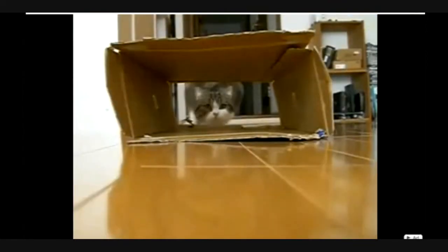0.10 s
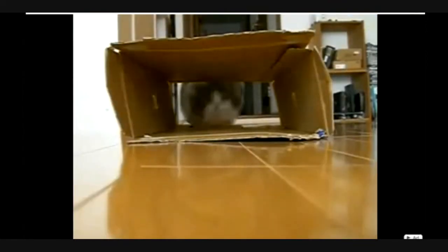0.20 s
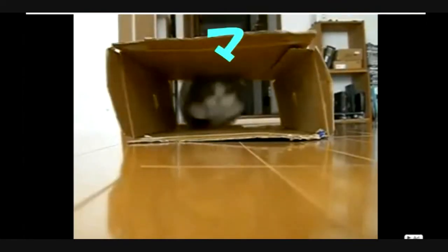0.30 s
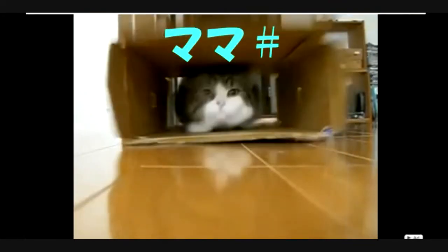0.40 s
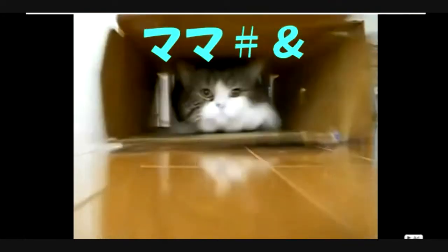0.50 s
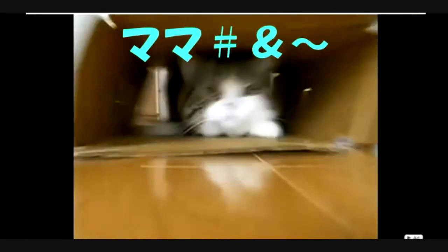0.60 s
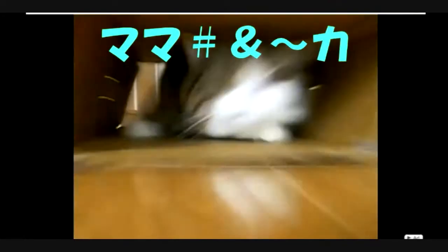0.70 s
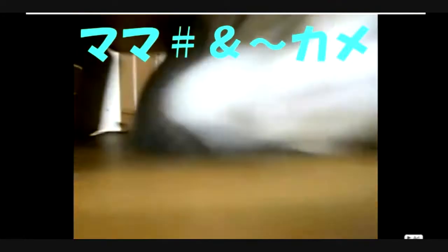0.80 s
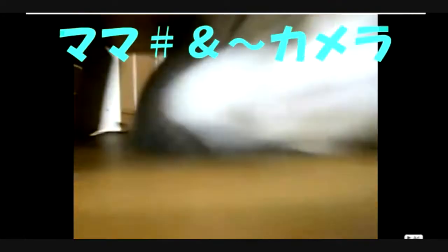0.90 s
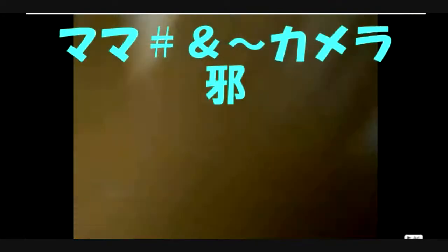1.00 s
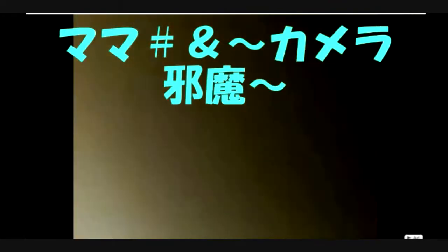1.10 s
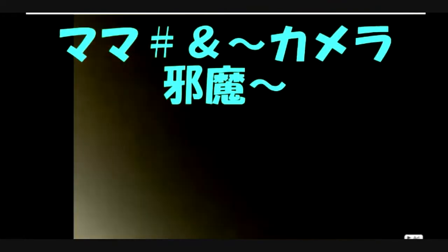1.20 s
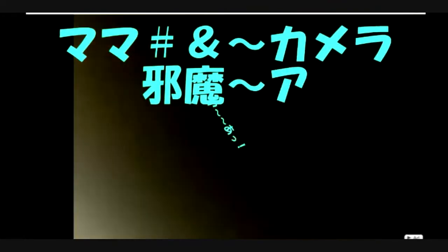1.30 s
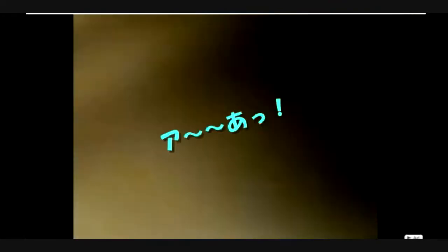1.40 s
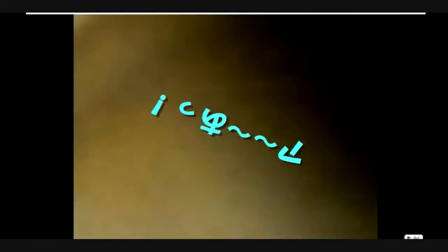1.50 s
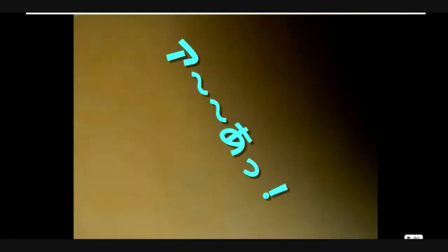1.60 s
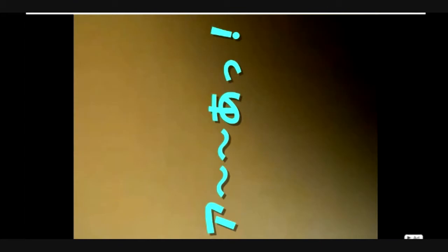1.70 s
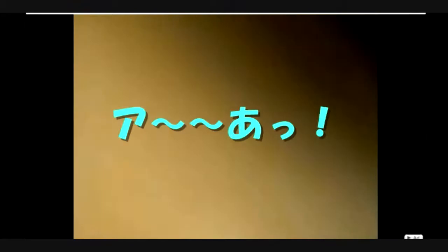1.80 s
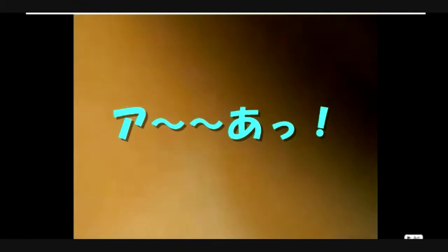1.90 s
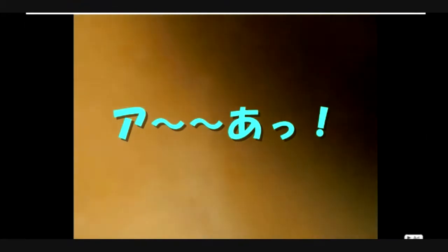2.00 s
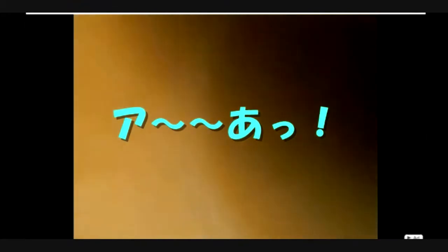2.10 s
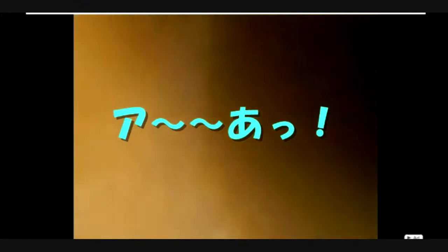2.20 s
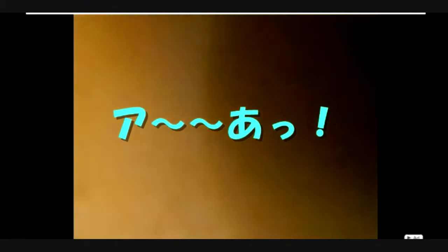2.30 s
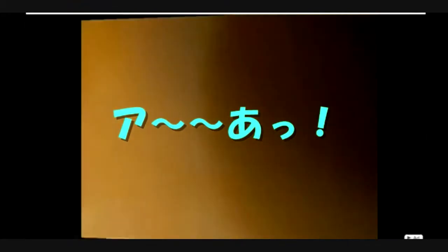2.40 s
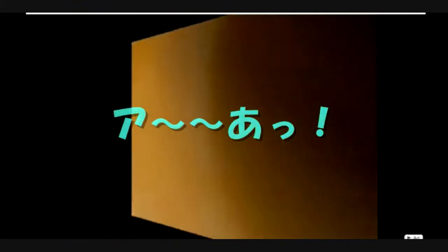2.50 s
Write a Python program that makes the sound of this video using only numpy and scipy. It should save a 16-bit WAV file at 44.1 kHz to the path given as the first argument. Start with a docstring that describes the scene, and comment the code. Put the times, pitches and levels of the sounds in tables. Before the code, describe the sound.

A cardboard box scrapes across a wooden floor, pushed by a running cat. Soft low paw thuds start around 0.2 s while the skid swells, until the box bumps the microphone near 0.8 s. It glides on with hissy scraping and rumbling panels to about 1.5 s, then hard knocks cluster at 1.6-1.7 s. Dull rubbing and small bumps fade by 2.5 s. Quiet room, very close, softly overloaded.

```python
"""Cat shoves a cardboard box into a camera

Paws thud; the box skids louder and louder over a wooden floor, hits a small camera, slides on, knocks and rubs.
Thumps are decaying tone pairs; knocks are random clicks around a blunt push, ringing in cardboard.
Skid, slide, rub and panel rumble are clumped random clicks, each with its own colour and level curve.
A quiet room noise lies beneath; the microphone overloads softly and narrow dips colour the whole.
"""
import sys
import numpy as np
from scipy import signal
from scipy.fft import rfft, irfft
from scipy.io import wavfile
from scipy.ndimage import uniform_filter1d

SR = 44100
rng = np.random.default_rng(int(sys.argv[2]) if len(sys.argv) > 2 else 0)


def dump_mix(stems):
    """Bounce the given channels to the path in sys.argv[1] as a 16-bit WAV at rate SR."""
    frames = np.atleast_2d(stems).T  # one column per channel
    limited = np.clip(frames, -1, 1)  # hard clip at full scale
    pcm = np.round(limited * 32767).astype(np.int16)
    wavfile.write(sys.argv[1], SR, pcm)


N = 114660

# Soft, heavy blows of paws and body on box and floor.
# Each row: start in seconds, level in dB, pitch in Hz, half the Gaussian fall time in seconds.
THUMPS = [(0.091, -22, 131, 0.0084), (0.218, -11.5, 103, 0.011), (0.247, -1.5, 109, 0.0036),
          (0.386, -9.5, 101, 0.011), (0.419, -6.5, 112, 0.0096), (0.647, -10.5, 134.6, 0.016),
          (0.694, -8, 112, 0.0039), (0.726, -8, 98.6, 0.014), (0.789, 0.5, 99, 0.0061),
          (.824, -20, 230, 0.0078), (.932, -9, 132, 0.0025), (1.017, -16, 106, 0.0049),
          (1.435, -5.5, 122, 0.0019), (1.453, -3.5, 135, 0.0051), (1.570, -6.5, 99, 0.0029),
          (1.618, -1, 118, 0.0037), (1.647, -0.5, 157, 0.0041), (1.662, -5, 84, 0.0028),
          (1.676, -8, 138, .003), (1.69, -6, 101, 0.0061), (1.991, -11, 243, 0.0054),
          (2.106, -9, 176, 0.0033), (2.161, -4.5, 219, 0.0046), (2.299, -3.5, 152, 0.0023)]
# Knocks and scuffs of cardboard edges and claws.
# Each row: peak in seconds, level in dB, rise in seconds, decay in seconds, brightness in dB per octave.
KNOCKS = [(0.217, -29, 0.0048, 0.011, 3), (0.25, -24.5, 0.006, 0.005, -0.5),
          (0.388, -21.5, 0.0012, 0.0045, 2), (0.427, -21.5, 0.0048, 0.0044, 2.5),
          (0.523, -22.5, 0.0075, 0.0059, 4.5), (0.733, -15.5, .003, 0.0017, 1.5),
          (0.796, -12, 0.012, 0.0011, 1), (0.829, -24, 0.00077, 0.0026, 3),
          (0.938, -22.5, 0.0048, 0.013, 1.5), (1.002, -20.5, 0.0007, 0.0073, 1.5),
          (1.35, -18.5, 0.0047, 0.0026, -4.5), (1.454, -8.5, 0.0039, 0.0021, -1.5),
          (1.505, -13, 0.00062, 0.0051, -1.5), (1.54, -21.5, 0.00094, 0.007, 0.5),
          (1.615, -1.5, 0.00067, 0.0028, 0), (1.622, -12.5, 0.00086, 0.0031, -1.5),
          (1.644, -7, 0.00091, 0.0036, -7), (1.653, -13.5, 0.0032, 0.0023, -1),
          (1.692, -10.5, 0.0021, 0.0027, -2.5), (1.700, -9, 0.0024, 0.0032, 1),
          (1.73, -20, 0.0067, 0.0075, -2.5), (1.937, -24, 0.00068, .005, 0.5),
          (1.979, -18.5, .0007, 0.0033, -5), (2.16, -19, 0.0031, 0.0021, 0.5),
          (2.200, -21.5, 0.0039, 0.0086, 0), (2.272, -31, 0.0016, 0.00075, -1),
          (2.307, -21, 0.003, 0.0053, 0.5)]
# Box pushed hard over the floor. Each row: time in seconds, level in dB.
SKID_LEVEL = [(.05, -64.5), (.17, -44.5), (.23, -37.5), (.36, -35), (.44, -26.5), (.54, -26), (.61, -21),
              (.72, -20.5), (.785, -18), (.81, -42), (1.52, -67), (1.565, -30.5), (1.605, -29.5),
              (1.64, -64)]
# Box gliding on after the hit. Each row: time in seconds, level in dB.
SLIDE_LEVEL = [(.82, -57), (.87, -28), (.91, -37.5), (.98, -35.5), (1.02, -31), (1.17, -29), (1.25, -32),
               (1.30, -37.5), (1.44, -33), (1.53, -44), (1.76, -38), (1.93, -37.5)]
# Pressure of the box wall on the camera. Each row: time in seconds, level in dB.
RUB_PRESSURE = [(.78, -46), (.81, -21), (.87, -26.5), (.91, -36), (.98, -67), (1.015, -21.5), (1.08, -43),
                (1.23, -27.5), (1.33, -22.5), (1.44, -25), (1.49, -31.5), (1.56, -24.5), (1.73, -24),
                (1.92, -25.5), (1.99, -20.5), (2.21, -21.5), (2.28, -23.5), (2.49, -33), (2.6, -40.5)]
# Drumming of the box panels as the load shifts. Each row: time in seconds, level in dB.
RUMBLE_LEVEL = [(0, -52), (.18, -35), (.28, -19), (.35, -24.5), (.50, -22), (.58, -24.5), (.65, -17.5),
                (.79, -20), (.87, -19.5), (.92, -39), (1.03, -21.5), (1.10, -32.5), (1.24, -27.5),
                (1.44, -23.5), (1.78, -38), (2.1, -30.5), (2.33, -33), (2.56, -39)]

# Spectrum of the hard skid. Each row: frequency in Hz, relative density in dB.
SKID_COLOUR = [(150, -1.5), (500, -11), (1300, -4), (1600, 0.5), (2200, -3.5), (3000, -7), (4500, -14.5),
               (6600, -18), (9200, -16.5), (13000, -61.5)]
# Spectrum of the glide. Each row: frequency in Hz, relative density in dB.
SLIDE_COLOUR = [(200, -5.5), (600, 3.5), (1600, 2.5), (2400, 4), (3100, 1), (4400, -9.5), (6600, -12.5),
                (8400, -7), (13000, -45.5)]
# Spectrum of the rubbing wall. Each row: frequency in Hz, relative density in dB.
RUB_COLOUR = [(30, -46.5), (90, -3.5), (150, 7), (240, -1.5), (340, -6.5), (700, -8.5), (1100, -14.5),
              (1600, -13.5), (2200, -24.5), (3300, -24.5), (4600, -32), (9500, -34), (13000, -55)]
# Spectrum of the drumming panels. Each row: frequency in Hz, relative density in dB.
RUMBLE_COLOUR = [(25, -11), (65, -1.5), (110, -4), (270, -11.5), (400, -19), (1000, -40)]
# Spectrum of a knock before its own tilt. Each row: frequency in Hz, relative density in dB.
KNOCK_COLOUR = [(50, -12.5), (220, 2), (400, 6.5), (720, 0.5), (1150, -6), (1750, -2.5), (2200, -11.5),
                (3000, -12), (4500, -20), (9300, -23), (13000, -54.5)]
# Spectrum of the room noise. Each row: frequency in Hz, relative density in dB.
ROOM_COLOUR = [(25, -20), (140, 8), (280, -14.5), (2400, -26), (7300, -28), (13000, -61.5)]
# Narrow dips in the sound, as from a close reflection.
# Each row: centre in Hz, width in Hz, depth in dB.
DIPS = [(1180, 45, 11), (1970, 35, 9), (2350, 35, 7), (3520, 70, 7)]

THUMP_RISE_S, THUMP_OVERTONE_RATIO, THUMP_OVERTONE_DB = 0.0023, 2.224, -15
PANEL_RING_DB, PANEL_RING_S = -31, 0.0094
PUSH_DB, PUSH_S = -0.5, 0.00029  # push against crunch, and its length
GRIT_HZ, GRIT_GROWTH = 1100, 0.49  # above GRIT_HZ, extra exponent on pressure
FLEX_DB, FLEX_HZ, FLEX_S = 2, 129, 0.069  # resonance shifts: depth, width, lifetime
SKID_ECHO_DB, NEAR_ECHO_DB, ECHO_T60_S = -12.5, -22, 0.14
ROOM_DB = -43
STOP_LOW_HZ, STOP_HIGH_HZ, STOP_DB = 4740, 6330, -31
TREBLE_HZ, EDGE_HZ = 12900, 16000
TICK_S, TICK_DB = 0.661, -11

T = np.arange(N) / SR
HZ = np.fft.rfftfreq(8192, 1 / SR)


def skid():
    """Box pushed hard: stick-slip on the floor, with resonances that shift as it bends."""
    friction = slips(per_s=3200, spread_db=1.3, judder_db=1.1, judder_hz=58.3)
    return flex(ring(friction, read(SKID_COLOUR))) * level(SKID_LEVEL)


def slide():
    """Box gliding after the hit: denser slips in a brighter colour."""
    friction = slips(per_s=6000, spread_db=2.0, judder_db=1.64, judder_hz=60)
    return flex(ring(friction, read(SLIDE_COLOUR))) * level(SLIDE_LEVEL)


def rubbing():
    """Box wall grates on the camera by stick-slip, duller when it presses lightly."""
    pressure = level(RUB_PRESSURE)
    friction = slips(per_s=3000, spread_db=2.0, judder_db=1.95, judder_hz=55.4) * pressure
    rub = flex(ring(friction, read(RUB_COLOUR)))
    body = signal.sosfiltfilt(signal.butter(2, GRIT_HZ, fs=SR, output="sos"), rub)
    grit = (rub - body) * (pressure / pressure.max()) ** GRIT_GROWTH
    return body + grit


def panel_rumble():
    """Box panels drum as the load shifts: sparse slips through a low colour."""
    shifts = slips(per_s=520, spread_db=1.0, judder_db=2.0, judder_hz=35.4)
    return ring(shifts * level(RUMBLE_LEVEL), read(RUMBLE_COLOUR))


def thump(start_s, db, hz, decay_s):
    """A panel swings a few times under a soft blow, with one overtone and a faint after-ring."""
    t = np.maximum(T - start_s, 0)
    rise = np.minimum(t / THUMP_RISE_S, 1)
    after_ring = amp(PANEL_RING_DB) * np.exp(-t / PANEL_RING_S)
    swing = np.exp(-(t / (2 * decay_s)) ** 2) + after_ring
    phase = 2 * np.pi * hz * t
    overtone = amp(THUMP_OVERTONE_DB) * np.sin(THUMP_OVERTONE_RATIO * phase)
    return amp(db) * rise * swing * (np.sin(phase) + overtone)


def knock(peak_s, db, rise_s, decay_s, bright_db):
    """An edge catches: random clicks rise to a blunt push at the peak, then fade, ringing in cardboard."""
    shape = np.exp(-np.maximum((peak_s - T) / rise_s, (T - peak_s) / decay_s))
    crunch = rng.choice([-1., 1.], N) * shape
    push = np.exp(-abs(T - peak_s) / PUSH_S)
    push *= amp(PUSH_DB) * np.linalg.norm(shape) / push.sum()
    octaves = np.log2(np.clip(HZ, 300, 5000) / 1000)
    return amp(db) * ring(crunch + push, read(KNOCK_COLOUR) + bright_db * octaves)


def room_noise():
    """Steady quiet room: coloured Gaussian noise."""
    return amp(ROOM_DB) * ring(rng.standard_normal(N), read(ROOM_COLOUR))


def room_echo(x, echo_db):
    """Adds a short decaying noise tail from walls and floor, keeping total power about the same."""
    t = T[:SR // 2]
    tail = rng.standard_normal(len(t)) * np.exp(-np.log(1000) * t / ECHO_T60_S)
    wet = signal.fftconvolve(x, tail / np.linalg.norm(tail))[:N]
    return (x + amp(echo_db) * wet) / np.hypot(1, amp(echo_db))


def slips(per_s, spread_db, judder_db, judder_hz):
    """Stick and slip: tiny clicks of uneven size and random sign, in clumps, at rms 1."""
    size = amp(spread_db * np.minimum(rng.exponential(1, N), 4))
    happens = rng.random(N) < per_s / SR
    clicks = size * rng.choice([-1, 1], N) * happens
    return evened(clicks * amp(judder_db * wander(judder_hz)))


def wander(rate_hz):
    """Quick, uneven flutter of rms 1, up to about this rate."""
    u = np.fft.rfftfreq(N, 1 / SR) / rate_hz
    return evened(irfft(rfft(rng.standard_normal(N)) * np.sqrt(u) / (1 + u ** 4), N))


def flex(x):
    """Resonances come and go at random as the cardboard bends: smooth gain patches in time and pitch."""
    hz, t, z = signal.stft(x, SR, nperseg=1024, noverlap=768)
    across = np.fft.fftfreq(len(hz), hz[1]) * FLEX_HZ
    along = np.fft.fftfreq(len(t), t[1]) * FLEX_S
    smooth = np.exp(-np.pi * (across[:, None] ** 2 + along ** 2))
    patches = evened(np.fft.ifft2(np.fft.fft2(rng.standard_normal(z.shape)) * smooth).real)
    gain = evened(amp(FLEX_DB * patches))
    return signal.istft(z * gain, nperseg=1024, noverlap=768)[1][:N]


def ring(x, db):
    """Passes x through a causal minimum-phase filter of unit energy with this dB response."""
    log_gain = np.log(amp(np.maximum(db, -100)))
    full = np.concatenate([log_gain, log_gain[-2:0:-1]])
    taps = np.fft.ifft(np.exp(signal.hilbert(full).conj())).real[:len(HZ)]
    return signal.fftconvolve(x, taps / np.linalg.norm(taps))[:N]


def read(colour):
    """Colour table in dB at every HZ, falling 20 dB per octave beyond its last row."""
    hz, db = np.transpose(colour)
    octaves_above = np.maximum(np.log2((HZ + 1) / hz[-1]), 0)
    return np.interp(np.log(HZ + 1), np.log(hz), db) - 20 * octaves_above


def level(curve):
    """Gain over time from (s, dB) points; -100 dB outside them."""
    s, db = np.transpose(curve)
    return amp(np.interp(T, s, db, left=-100, right=-100))


def low_pass(x, hz):
    """Steep linear-phase cut above hz."""
    return signal.oaconvolve(x, signal.firwin(511, hz, window=("kaiser", 9), fs=SR), "same")


def evened(x):
    """Scales to rms 1."""
    return x / np.sqrt(np.mean(x ** 2) + 1e-20)


def amp(db):
    """Decibels to gain."""
    return 10 ** (np.asarray(db) / 20)


def scene():
    """Near-dry rubbing, rumble, thumps and knocks; more echoing skid and slide; quiet room."""
    thumps = sum(thump(*row) for row in THUMPS)
    knocks = sum(knock(*row) for row in KNOCKS)
    near = rubbing() + panel_rumble() + thumps + knocks
    floor = skid() + slide()
    return (room_echo(floor, SKID_ECHO_DB) + room_echo(near, NEAR_ECHO_DB) + room_noise())[None]


def record(dry):
    """Microphone overloads softly; then narrow dips, a missing treble band, one thin tick, the band limit."""
    driven = dry[0] / (1 + dry[0] ** 6) ** (1 / 6)
    hz = np.fft.rfftfreq(N, 1 / SR)
    dips_db = -sum(depth * np.exp(-((hz - centre) / width) ** 2) for centre, width, depth in DIPS)
    in_band = (hz > STOP_LOW_HZ) & (hz < STOP_HIGH_HZ)
    stopped = uniform_filter1d(1. * in_band, size=160)  # soft band edges
    filtered = irfft(rfft(driven) * amp(dips_db + STOP_DB * stopped), N)
    tick = amp(TICK_DB) * np.sinc((T - TICK_S) * SR)
    return low_pass(low_pass(filtered, TREBLE_HZ) + tick, EDGE_HZ)[None]


dry = scene()
out = record(dry)
dump_mix(out)
```